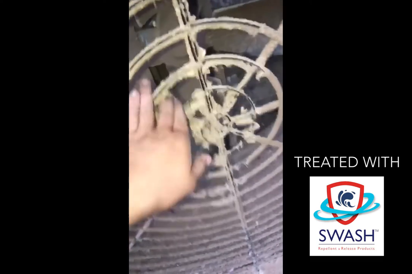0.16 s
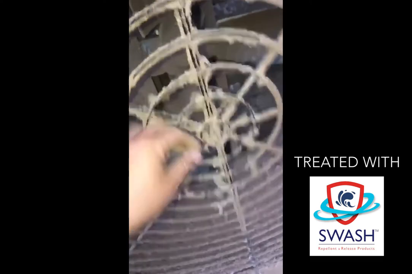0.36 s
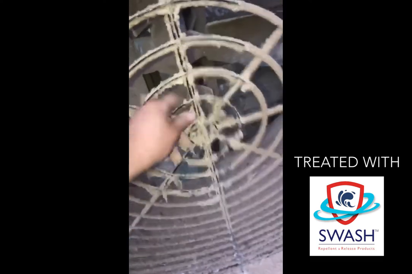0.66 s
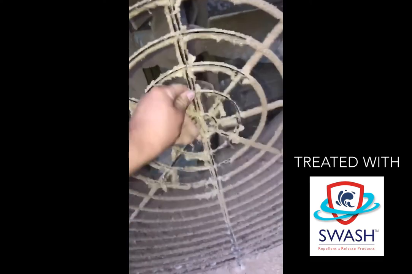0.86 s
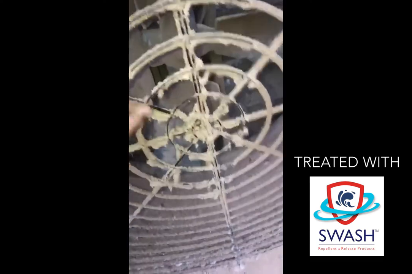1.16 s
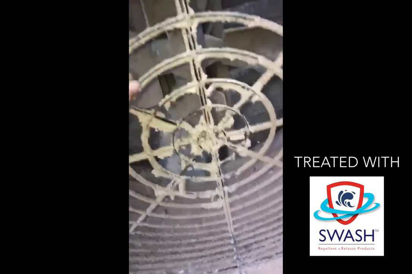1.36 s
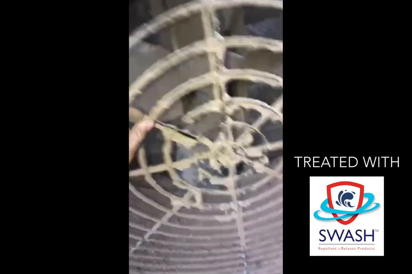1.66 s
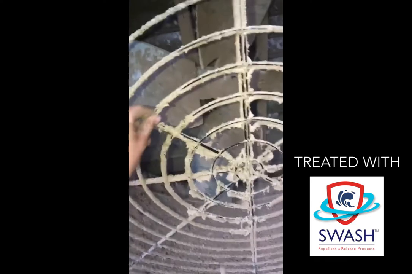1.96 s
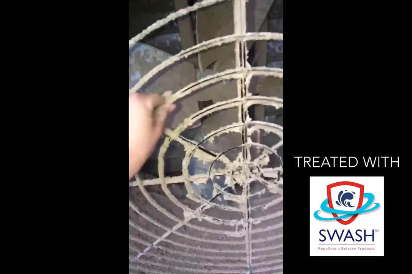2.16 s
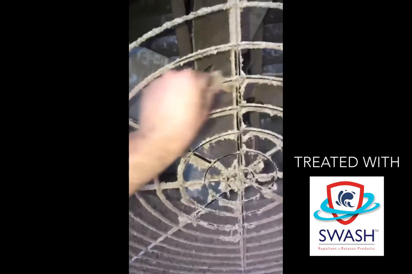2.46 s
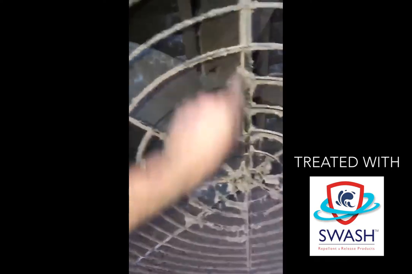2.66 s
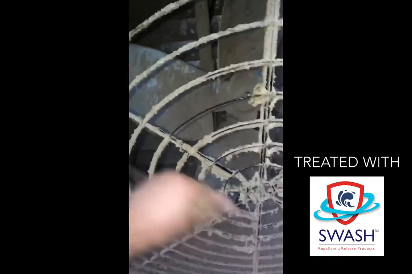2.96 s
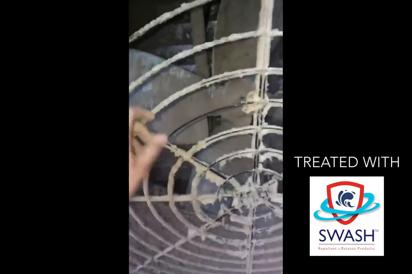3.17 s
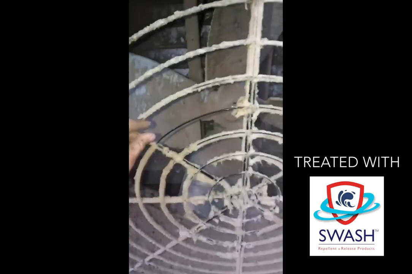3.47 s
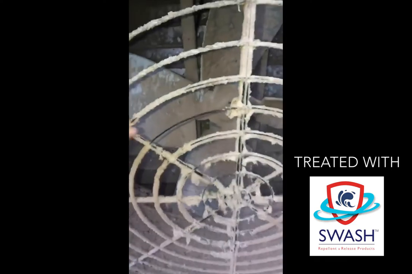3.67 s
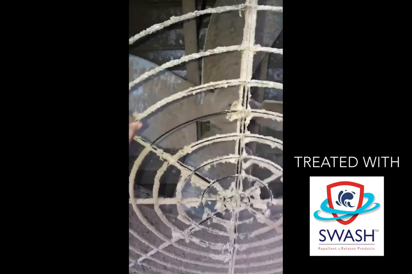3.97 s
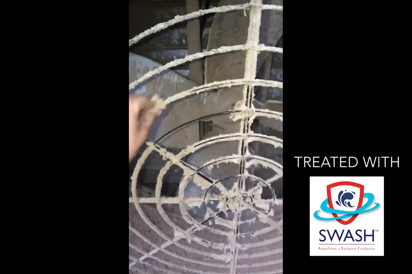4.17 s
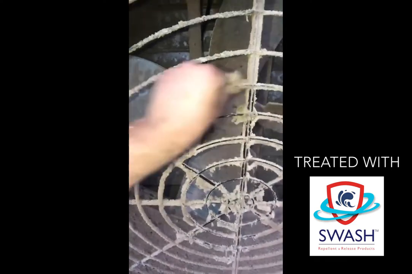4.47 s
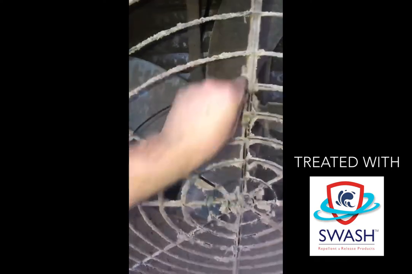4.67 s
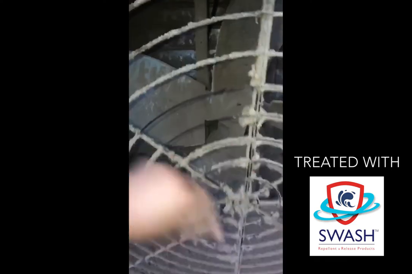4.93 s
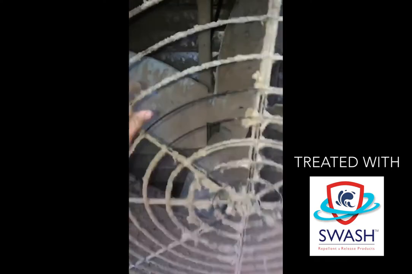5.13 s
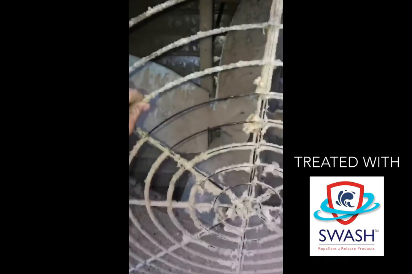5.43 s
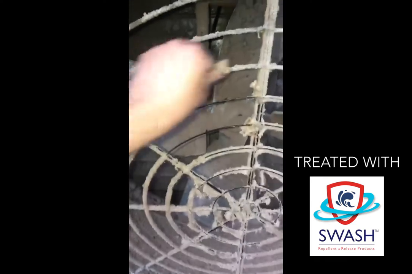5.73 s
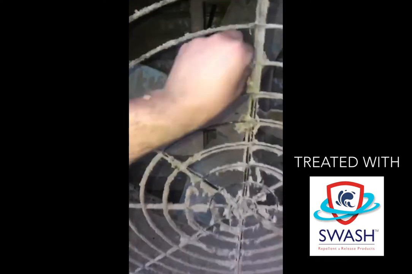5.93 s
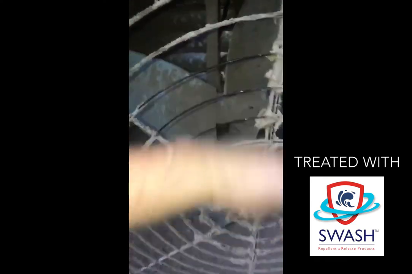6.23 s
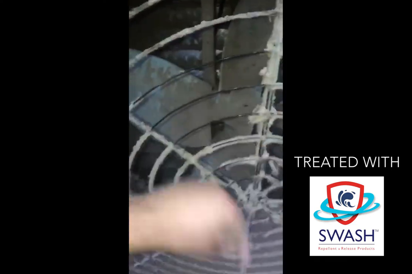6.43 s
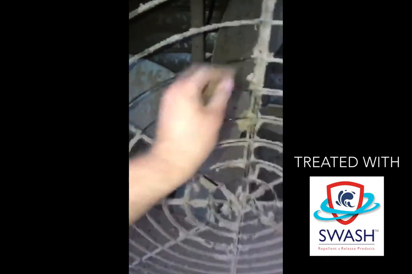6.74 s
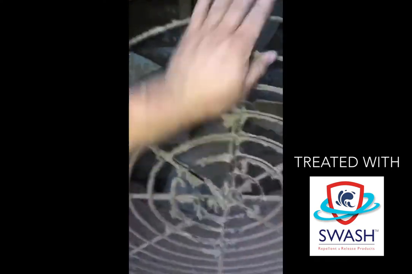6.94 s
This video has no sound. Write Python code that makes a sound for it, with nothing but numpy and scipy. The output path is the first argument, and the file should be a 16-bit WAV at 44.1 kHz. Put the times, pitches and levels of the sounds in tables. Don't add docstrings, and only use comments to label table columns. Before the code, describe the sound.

Inside a livestock shed, big exhaust fans drone with a deep, slowly beating throb, motor hum, rumble and rushing air. Close to the microphone a hand rubs dry crust from a wire guard in short crackly strokes with small snaps. A near cricket trills almost continuously, with a higher far cricket, distant crickets, a thin katydid rasp and occasional bird peeps. Near the end the sound blinks out, returns with a low thump, and stops abruptly.

```python
import sys
import numpy as np
from scipy import signal
from scipy.fft import rfft, irfft
from scipy.io import wavfile

SR = 44100
rng = np.random.default_rng(int(sys.argv[2]) if len(sys.argv) > 2 else 0)


def bounce(signal):
    frames = np.transpose(np.atleast_2d(signal))
    limited = np.clip(frames, -1, 1)
    pcm = np.round(limited * 32767).astype(np.int16)
    wavfile.write(sys.argv[1], SR, pcm)


def gain_from_decibels(decibels):
    exponent = np.asarray(decibels, float) / 20
    return 10 ** exponent


N = 313110
T = np.arange(N) / SR

# time in seconds, level in dB.
TRILL_EFFORT = [(0, -61), (1.1, -57.5), (2.1, -60), (2.9, -58.5), (3.6, -62.5), (4.2, -61), (4.7, -59),
                (5.4, -60), (6.4, -57.5), (6.7, -60.5), (6.8, -62), (6.95, -68)]
END_S = 6.9868


def rms_one(x):
    return x / np.sqrt(np.mean(x ** 2) + 1e-20)


def in_time(rows):
    s, *columns = np.transpose(rows)
    return [np.interp(T, s, c) for c in columns]


def drift(rate):
    r = np.exp(-80 * np.pi * rate / SR)
    slow = signal.lfilter([1], [1, -2 * r, r * r], rng.standard_normal(N // 40 + 3002))[3000:]
    return np.interp(np.arange(N) / 40, np.arange(len(slow)), rms_one(slow - slow.mean()))


def coloured(white, spectrum, shared_db, own_db, rate):
    hz = np.arange(N // 2 + 1) * SR / N + 1
    points = np.array(spectrum)
    curve_db = np.interp(np.log(hz), np.log(points[:, 0]), points[:, 1], left=-90, right=-90)
    shaped = rfft(white) * gain_from_decibels(curve_db)
    out, together = np.zeros(N), drift(rate)
    lowest = np.floor(2 * np.log2(points[0, 0]))
    for centre in np.arange(lowest, 2 * np.log2(points[-1, 0]) + 1):
        share = np.clip(1 - abs(2 * np.log2(hz) - centre), 0, 1)
        out += irfft(shaped * share, N) * gain_from_decibels(shared_db * together + own_db * drift(2 * rate))
    return rms_one(out)


def resonance(x, hz, width_hz):
    r = np.exp(-np.pi * width_hz / SR)
    poles = [1, -2 * r * np.cos(2 * np.pi * hz / SR), r * r]
    return signal.lfilter(np.array([1, 0, -1]) * (1 - r * r) / 2, poles, x)


def ringing_noise(hz, width_hz):
    return resonance(resonance(rng.standard_normal(N), hz, width_hz), hz, width_hz)


def bursts(rows, rise_s, fall_s):
    power = 0
    for s, length, db in rows:
        edge = np.minimum((T - s) / rise_s, (s + length + fall_s - T) / fall_s)
        power = power + gain_from_decibels(2 * db) * np.clip(edge, 0, 1) ** 2
    return np.sqrt(power)


def add(track, s, db, from_hz, to_hz, length_s, phase, bend=1):
    u = np.arange(int(length_s * SR)) / int(length_s * SR)
    glide = np.sin(phase + 2 * np.pi * np.cumsum(from_hz + (to_hz - from_hz) * u ** bend) / SR)
    i = int((s - length_s / 2) * SR)
    if i >= 0:
        track[i:i + len(u)] += gain_from_decibels(db) * np.sqrt(np.sin(np.pi * u)) * glide


def echo(x, t60, wet_db):
    tail = rng.standard_normal(SR // 4) * gain_from_decibels(-60 * T[:SR // 4] / t60)
    return x + gain_from_decibels(wet_db) * signal.fftconvolve(x, tail / np.sqrt(np.sum(tail ** 2)))[:N]


def blades():
    # multiple of the blade rate, rms in dB, rms in dB in the later balance.
    overtones = [(1, -28.5, -29.5), (2, -48.5, -41), (3, -45.5, -46), (4, -57, -52), (5, -55.5, -54.5),
                 (6, -58, -54), (7, -53, -54), (8, -51.5, -56.5), (9, -54.5, -58.5), (10, -67.5, -63.5),
                 (11, -55, -58), (12, -63, -65), (13, -70, -65.5), (14, -68, -64.5), (16, -70, -69.5)]
    # multiple, blade rate in Hz, rms in dB, moment in step in seconds.
    neighbours = [(1, 31.535, -39.3, 1.8), (1, 31.74, -44, 2.2), (2, 31.535, -51, .005),
                  (2, 31.92, -47.2, 1.55), (3, 31.535, -49, .77), (3, 31.81, -45.4, 3.97),
                  (3, 31.92, -47.8, 2.18), (4, 31.535, -48.2, .27), (4, 31.92, -48.9, 1.49),
                  (4, 31.81, -56.5, .77), (6, 31.83, -51.5, 2.13), (7, 31.535, -52.7, .218),
                  (7, 31.92, -59.9, .253), (8, 31.535, -57.2, .103), (8, 31.92, -60.5, .265),
                  (11, 31.535, -60.3, .236), (11, 31.92, -60.6, .754), (12, 31.535, -56.5, .035),
                  (12, 31.92, -63, 1.346), (13, 31.535, -65.4, .153), (13, 31.92, -62.5, .067)]
    # time in seconds, share of the way to the later balance
    tone_balance = [
        (0, 0.0),
        (1.3, 0.6),
        (1.8, 0),
        (4.5, 0.18),
        (6.0, 0.2),
        (6.06, .95),
        (7.1, 0.6),
    ]
    blade_hz, shake_db, shake_rad, neighbour_shake_db = 31.862, .5, .08, .6
    out, turn, shifted = 0, {}, np.clip(in_time(tone_balance)[0], 0, 1)
    for k, db, later_db in overtones:
        shake = shake_rad * np.sqrt(k - 1) * drift(1.23)
        turn[k] = 2 * np.pi * k * blade_hz * T + rng.uniform(0, 2 * np.pi) + shake
        level_db = db + shifted * (later_db - db) + shake_db * np.log(k + .5) * drift(1.5)
        out += gain_from_decibels(level_db) * np.sin(turn[k])
    for k, hz, db, in_step_s in neighbours:
        beat = 2 * np.pi * k * (hz - blade_hz) * (T - in_step_s)
        out += gain_from_decibels(db + neighbour_shake_db * drift(0.5)) * np.sin(turn[k] + beat)
    return np.sqrt(2) * out


def motor():
    return gain_from_decibels(-46.5 + 2.0 * drift(1.4)) * np.sin(2 * np.pi * 121 * T + .5 * drift(0.45))


def airflow():
    # frequency in Hz, density in dB per Hz.
    rumble_spectrum = [(12, -17), (25, 0.5), (48, 4), (80, 1.5), (110, 0), (160, -3), (250, -4.5),
                       (330, -8), (420, -9), (520, -16), (750, -28), (1000, -35.5)]
    rush_spectrum = [(350, -25), (600, -1.5), (780, -7.5), (1000, -5.5), (1270, -5.5), (1560, -6.5),
                     (2500, -15), (3660, -18), (4300, -23), (4950, -24), (6300, -21), (8400, -23),
                     (10000, -35.5), (10700, -42)]
    # frequency in Hz, width in Hz, level in dB.
    housing_modes = [(495.5, 28, 4.5), (620, 32, -1.5), (680, 18, -3), (795, 30, -1.5), (887.5, 47, 2.5),
                     (1015, 58, 4), (1113, 32, 3), (1196, 74, -0.5), (1337, 76, -2.5), (1454, 24, -6.5),
                     (1673, 14, -5.5), (1974, 94, -7)]
    rumble = coloured(rng.standard_normal(N), rumble_spectrum, shared_db=-0.54, own_db=1.0, rate=5.7)
    rush = coloured(rng.standard_normal(N), rush_spectrum, shared_db=0.3, own_db=1.0, rate=16.0)
    housing = sum(gain_from_decibels(db + 1.2 * drift(3.8)) * ringing_noise(hz, width_hz)
                  for hz, width_hz, db in housing_modes)
    rush_db = -53.5 + 0.1466 * T
    housing_db = -57 - 1.8 * T + 4.5
    return gain_from_decibels(-37.5) * rumble + gain_from_decibels(rush_db) * rush + gain_from_decibels(housing_db) * rms_one(housing)


def buffet():
    # start in seconds, length in seconds, level in dB.
    thumps = [
        (.0, .12, -44),
        (6.62, 0.29, -35.5),
    ]
    return bursts(thumps, rise_s=0.049, fall_s=0.045) * rms_one(ringing_noise(62.1, 5.2))


def hand():
    # start in seconds, length in seconds, level in dB.
    strokes = [(.09, 0.48, -57.5), (.93, .2, -62), (1.13, 0.41, -64.5), (2.21, .2, -62.5),
               (2.42, 0.13, -58), (3.02, 0.31, -62), (3.96, 0.089, -61.5), (4.16, 0.13, -62),
               (4.33, 0.14, -57.5), (4.48, .16, -56), (4.62, 0.2, -55), (4.66, .16, -54.5),
               (5.45, 0.63, -61), (6.07, 0.19, -69), (6.56, .14, -59), (6.7, .3, -61)]
    # frequency in Hz, density in dB per Hz.
    crust = [(2500, -28), (3350, -7), (3700, -3.5), (4100, -0.5), (5100, -9), (6200, -0.5), (6550, 0),
             (6750, 4.5), (6950, -1), (7800, -0.5), (9000, -2.5), (10500, -18), (12500, -40)]
    # time in seconds, level in dB, frequency in Hz.
    snaps = [
        (.092, -48, 6030),
        (0.092, -50, 9300),
        (.43, -54.5, 6650),
        (1.088, -60, 6300),
        (4.22, -57, 7300),
        (6.659, -60, 7900),
    ]
    sizes = gain_from_decibels(1.77 * rng.exponential(1, N)) * rng.choice([-1, 1], N)
    grains = sizes * (rng.random(N) < 9000 / SR)
    resting_db = -66.5
    pressure = np.hypot(bursts(strokes, rise_s=0.042, fall_s=0.12), gain_from_decibels(resting_db))
    rub = pressure * gain_from_decibels(-2.5) * coloured(grains, crust, shared_db=1.0, own_db=1.3, rate=25.0)
    for s, db, hz in snaps:
        add(rub, s, db, 1.04 * hz, .96 * hz, .0025, 0)
    return rub


def wire():
    # time in seconds, level in dB.
    singing = [
        (.12, -84),
        (.25, -79),
        (.31, -61),
        (.37, -67),
        (.45, -75),
        (.6, -74),
        (.68, -93),
    ]
    return gain_from_decibels(in_time(singing)[0]) * rms_one(ringing_noise(3320, 220)) * (T < singing[-1][0])


def wing_strokes():
    # start in seconds, triplets of wing strokes, strokes in the closing run.
    phrases = [(.0235, 3, 2), (.2677, 3, 4), (.5304, 4, 7), (.9136, 1, 11), (1.1817, 1, 7), (1.3892, 1, 6),
               (1.5686, 4, 6), (1.9396, 1, 5), (2.099, 2, 20), (2.5836, 1, 4), (2.7246, 5, 4),
               (3.1221, 0, 9), (3.3093, 1, 0), (3.5449, 0, 5), (3.6489, 0, 2), (3.9297, 3, 6),
               (4.2323, 0, 4), (4.3116, 4, 9), (4.72, 0, 4), (4.8018, 2, 5), (5.0228, 0, 4), (5.1018, 4, 9),
               (5.5212, 4, 7), (5.9074, 1, 4), (6.0874, 1, 8), (6.2889, 0, 5), (6.3879, 2, 0),
               (6.6402, 1, 7), (6.8643, 0, 2)]
    triplet_s, stroke_s, slowest_stroke_s, pause_s = .0635, .0157, .018, .032
    times = []
    for (s, triplets, closing), (next_s, *_) in zip(phrases, phrases[1:] + [(N / SR,)]):
        times += [s + t * triplet_s + k * stroke_s for t in range(triplets) for k in range(3)]
        run_s = s + triplets * triplet_s
        apart = min((next_s - pause_s - run_s) / max(closing - 1, 1), slowest_stroke_s)
        times += [run_s + k * apart for k in range(closing)]
    return times


def near_cricket():
    song, times = np.zeros(N), wing_strokes()
    for s, (a, b, c) in zip(times, rng.standard_normal((len(times), 3))):
        add(song, s - .001 + .0005 * a, 1.3 * b, 4730 + 25 * a, 4220 + 30 * b, .0125, 3 * c, bend=1.5)
    hoarse_db = 1.6 * drift(110)
    return gain_from_decibels(0.1) * echo(song * gain_from_decibels(in_time(TRILL_EFFORT)[0] + hoarse_db), t60=.07, wet_db=-3)


def far_cricket():
    # start in seconds, level in dB.
    chirps = [(-.0374, -57), (.205, -61), (.437, -62), (0.693, -59), (.952, -57), (1.209, -60),
              (1.487, -61), (1.745, -63), (2.035, -66), (2.27, -62.5), (2.485, -65), (2.735, -61.5),
              (2.972, -62.5), (3.225, -74), (3.454, -66), (3.695, -65), (3.93, -65), (4.224, -66),
              (4.49, -60.5), (4.716, -70), (4.967, -58.5), (5.225, -68), (5.52, -71), (5.741, -61),
              (5.985, -65), (6.036, -58.5), (6.292, -55), (6.542, -57), (6.782, -68)]
    song = np.zeros(N)
    for s, db in chirps:
        for k, (a, b, c) in enumerate(rng.standard_normal((6, 3))):
            stroke_db = db + 1.8 * a - 3 * (k == 0)
            add(song, s + k * .0116, stroke_db, 8380 + 70 * b, 8150 + 70 * b, .0065, 3 * c)
    return echo(song, t60=.09, wet_db=-7)


def chorus():
    band = ringing_noise(4640, 260)
    singing = bursts([(0, 3.36, 0), (3.54, .14, 0), (3.92, 2.58, 0), (6.63, .3, 0)], .02, .03)
    return singing * gain_from_decibels(in_time(TRILL_EFFORT)[0] - 12 + 1.9 * drift(12)) * rms_one(band)


def high_rasp():
    # start in seconds, length in seconds, level in dB.
    rasps = [(.135, 0.023, -77), (.22, 0.12, -76), (.92, 0.21, -79), (1.205, .57, -78.5), (1.995, .03, -80),
             (2.17, 0.024, -83), (2.28, 0.021, -89), (2.44, 0.14, -84), (2.86, .9, -77),
             (4.19, .025, -79.5), (4.25, 0.15, -83), (4.48, .42, -74.5), (5.01, .04, -85),
             (5.11, .025, -78), (5.23, 0.092, -79), (5.335, .7, -74.5), (6.07, 0.18, -75.5),
             (6.635, 0.028, -77), (6.72, .03, -84)]
    band = signal.butter(2, [11000, 11900], "band", fs=SR, output="sos")
    rasp = signal.sosfilt(band, rng.standard_normal(N))
    flutter = gain_from_decibels(3.2 * drift(40) + 3.5 * drift(12))
    return bursts(rasps, rise_s=.012, fall_s=0.018) * flutter * rms_one(rasp)


def bird():
    # time in seconds, level in dB, start pitch in Hz, end pitch in Hz, length in seconds.
    peeps = [
        (.96, -54, 6300, 7400, .026),
        (3.035, -55, 6400, 7300, .024),
        (3.17, -64, 6700, 7300, .02),
        (3.885, -56.5, 6400, 7300, .02),
        (5.515, -63, 6600, 7150, .02),
        (5.625, -56.5, 6400, 7400, .022),
    ]
    out = np.zeros(N)
    for s, db, from_hz, to_hz, length_s in peeps:
        add(out, s, db, from_hz, to_hz, length_s, 0)
    return echo(out * gain_from_decibels(3 * drift(260)), t60=.1, wet_db=-2)


def scene():
    fans = blades() + motor() + airflow() + buffet()
    guard = hand() + wire()
    background = near_cricket() + far_cricket() + chorus() + high_rasp() + bird()
    return (fans + guard + background)[None]


def drop_weak_bands(x):
    # from Hz, to Hz, share of blocks kept (0-1), masking by the band near 8 kHz (0-1).
    kept_bands = [(4990, 5340, .97, 0), (7060, 7400, .985, 0), (8400, 9100, .985, 1), (9100, 9780, .84, .9),
                  (9780, 10480, .36, .2), (10480, 10850, .07, 0), (10850, 11850, .54, 0),
                  (11850, 12500, .24, 0), (12500, 22050, .01, 0)]
    blocks = dict(fs=SR, window=("tukey", .5), nperseg=1408, noverlap=384)
    hz, _, z = signal.stft(x, **blocks)

    def loudness(lo, hi):
        return np.log(np.mean(abs(z[(hz >= lo) & (hz < hi)]) ** 2, axis=0) + 1e-20)

    masker = loudness(7900, 8400)
    for lo, hi, kept, masking in kept_bands:
        worth = loudness(lo, hi) - masking * masker + 0.51 * rng.standard_normal(len(masker))
        z[(hz >= lo) & (hz < hi)] *= np.where(worth > np.quantile(worth[:-6], 1 - kept), 1, .003)
    return signal.istft(z, **blocks)[1][:N]


def dropout():
    fade_s, gap_s, back_s = 6.015, 6.04, 6.0643
    fade = np.cos(np.pi / 2 * np.clip((T - fade_s) / (gap_s - fade_s), 0, 1)) ** 1.5
    return np.where(T < back_s, fade, np.clip((T - back_s) / .0005, 0, 1) * (T < END_S))


def residue():
    low = signal.butter(8, 650, fs=SR, output="sos")
    murmur = signal.sosfilt(low, rng.standard_normal(N) * (T < END_S + .028))
    return gain_from_decibels(np.where(T < END_S, -76, -79)) * rms_one(murmur)


def low_pass(x):
    return signal.sosfilt(signal.butter(12, 12720, fs=SR, output="sos"), x)


def record(dry):
    murmur = residue()
    mix = drop_weak_bands(dry[0])[None] * dropout() + murmur
    return low_pass(mix)


dry = scene()
out = record(dry)
bounce(out)
```